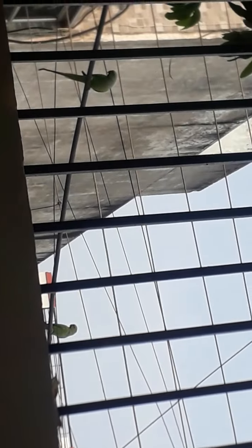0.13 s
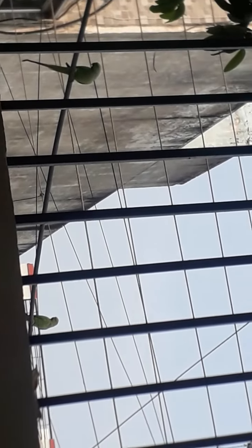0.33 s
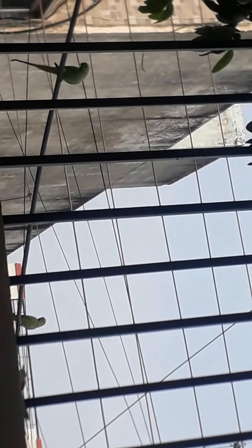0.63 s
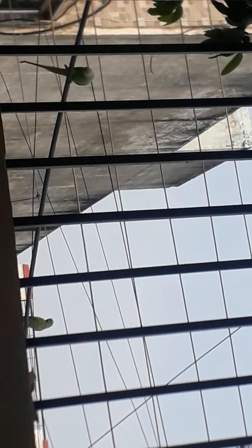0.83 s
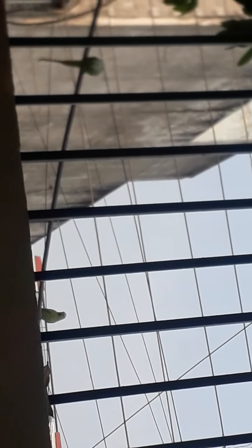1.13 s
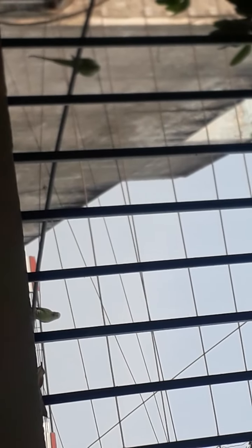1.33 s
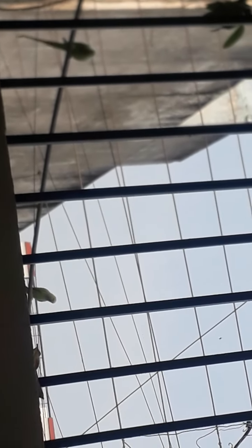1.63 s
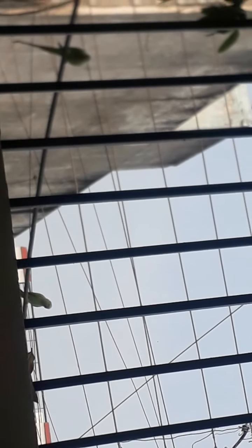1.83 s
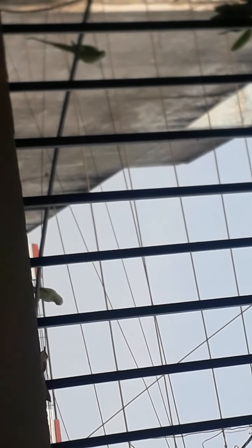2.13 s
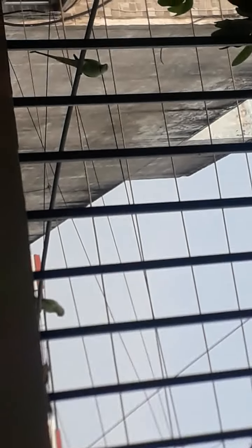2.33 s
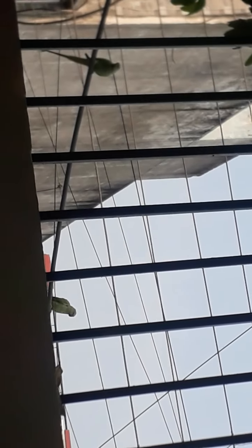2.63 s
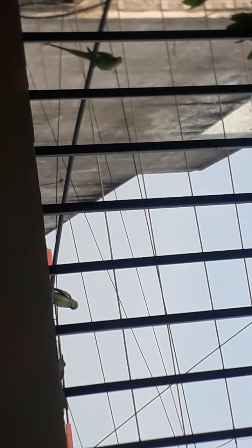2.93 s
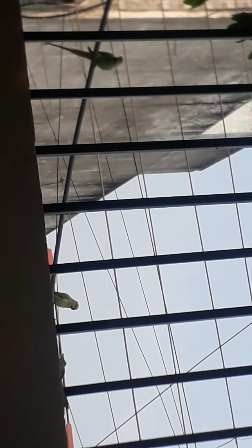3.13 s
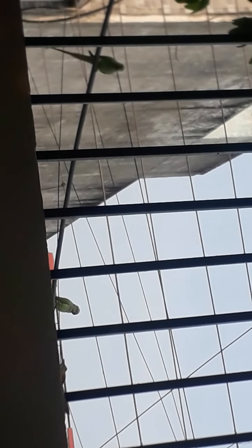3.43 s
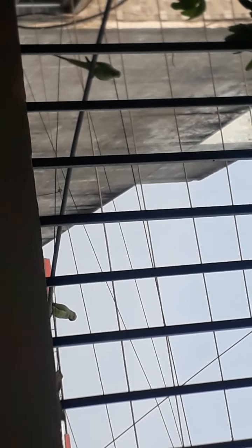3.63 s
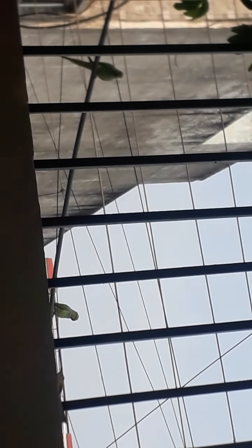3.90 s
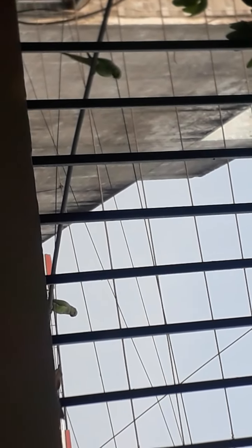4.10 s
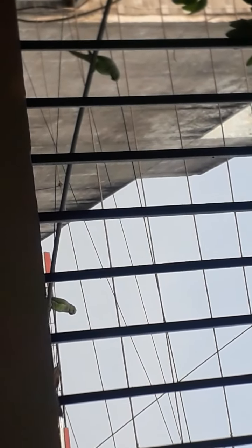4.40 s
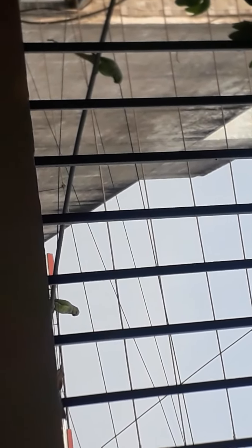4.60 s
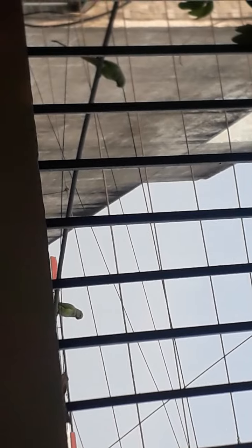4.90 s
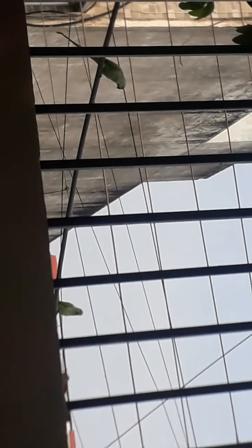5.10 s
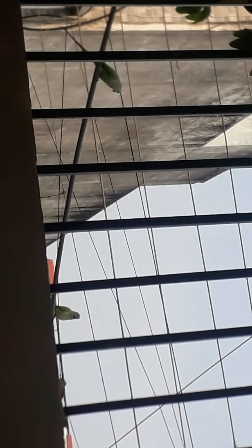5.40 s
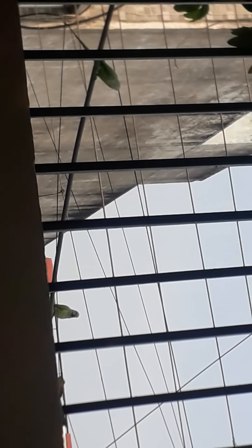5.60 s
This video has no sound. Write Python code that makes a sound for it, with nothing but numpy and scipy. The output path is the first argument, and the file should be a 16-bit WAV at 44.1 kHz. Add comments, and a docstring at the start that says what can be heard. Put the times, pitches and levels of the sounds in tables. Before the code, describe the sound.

Parakeets overhead in a narrow, hard-walled courtyard: three piercing calls, a gap, then a longer run starting with a rough, wobbling screech and ending in stragglers. Each squawk scoops up quickly and slides down, with a bright nasal edge. Behind them lie low rumble, distant traffic and a thin far machine whine. A phone picks it all up with an audible reverberant tail.

```python
"""Parakeets squawk from wires above a narrow courtyard: a run of three calls, then a longer run and stragglers.
Each call sums harmonics of a pitch that arches up and slides down through the throat's resonances.
Each run opens with a harsh screech: a rising yelp, a brief whistle, then a warbling rasp.
The walls return echoes and a diffuse tail. Shaped noise makes the town rumble and traffic;
wavering sines make a far machine whine and passing tones; a brief rush of noise opens the scene."""
import sys
import numpy as np
from scipy import signal
from scipy.fft import rfft, irfft
from scipy.io import wavfile
from scipy.ndimage import uniform_filter1d, map_coordinates

SR = 44100
rng = np.random.default_rng(int(sys.argv[2]) if len(sys.argv) > 2 else 0)


def store_pcm(level_fs):
    """Save levels as 16-bit WAV."""
    pcm = np.round(np.clip(level_fs, -1, 1) * 32767).astype(np.int16)
    wavfile.write(sys.argv[1], SR, np.atleast_2d(pcm).T)


N = 253575
TIME_S = np.arange(N) / SR

# opening rush spectrum, relative: f/Hz, density/dB
RUSH_SPECTRUM = [(200, -21), (450, -7.5), (700, -0.5), (1050, 1.5), (1400, 1), (1800, 2), (2700, -2.5),
                 (3100, -7.5), (4200, -12), (5000, -11), (5800, -5.5), (6900, -10.5), (8000, -33),
                 (15000, -52)]
RUSH_DB, RUSH_DECAY_DB_PER_S = -38.5, 43.5
RUSH_START_S, RUSH_ATTACK_S, RUSH_HOLD_S = -0.026, 0.097, 0.094

# town rumble spectrum, relative: f/Hz, density/dB
TOWN_SPECTRUM = [(20, -35), (40, -7), (60, -13.5), (80, 3), (102, 0), (122, -2.5), (170, -0.5), (300, -7),
                 (900, -9), (2400, -12.5), (3100, -23.5), (4300, -25), (6500, -25), (8000, -43),
                 (15500, -32)]
TOWN_DB = -54
# distant traffic spectrum, relative: f/Hz, density/dB
TRAFFIC_SPECTRUM = [(50, -9.5), (120, -5), (240, 5.5), (450, 1.5), (700, -1), (1100, -1.5), (2500, -31.5)]
TRAFFIC_DB = -62.5
# passing traffic swells: t/s, half length to 1/e/s, level added to the steady gain/dB
TRAFFIC_SWELLS = [(2.83, 0.42, -56.5), (4.4, 1, -64.5)]
# far machine whine before sway: f/Hz, rms level/dB
MACHINE_WHINE = [(953, -70.5), (1168, -64), (2336, -63), (3505, -82)]
# distant tones that come and go, before sway: start t/s, end t/s, f/Hz, rms level/dB
PASSING_TONES = [(.3, 1.038, 3670, -70), (2.1, 2.898, 3650, -66.5), (2.1, 2.9, 3390, -72.5),
                 (2.1, 2.9, 3994, -79), (4.35, 4.793, 301.7, -59.5), (4.794, 5.615, 296.4, -60)]

# throat and beak resonances, run 0: f/Hz, gain/dB
FIRST_THROAT = [(300, -52), (1450, -17.5), (1850, -13.5), (2550, -10), (3100, -12), (4000, -10.5),
                (5000, -4), (5800, 4), (7200, -8.5), (8200, -22), (10000, -31), (11500, -21.5),
                (13200, -31.5), (15500, -54)]
# throat and beak resonances, run 1: f/Hz, gain/dB
SECOND_THROAT = [(300, -17), (1520, -22.5), (1850, -18), (2450, -15.5), (3100, -21), (4100, -12.5),
                 (4900, -5.5), (5400, -10), (6200, 0), (7400, -23), (10000, -30.5), (11000, -39),
                 (12000, -35), (15500, -49)]
# call levels below are before the throat gain
# yelps: run (0 or 1), t/s, time to crest/s, crest f/Hz, level at end/dB, start level re end/dB
YELPS = [(0, 1.158, .045, 2633, -21, -14), (1, 2.791, .048, 2680, -14, -26)]
# voice broken into a whistle inside a screech:
# t/s, length/s, f/Hz, fundamental's peak level/dB, second partial re fundamental/dB
WHISTLES = [(1.201, 0.0043, 3700, -30.5, 3), (1.208, .008, 3620, -37.5, 10),
            (2.832, .054, 4050, -26.5, -23)]
# rasps: run (0 or 1), t/s, length/s, base f/Hz, level/dB, loudest at (share of length),
# start roughness (0-1), roughness gained by end (0-1), warble rate at start f/Hz, at end f/Hz,
# warble depth (share of pitch), warble decay/s, throb (sign sets its sense)/dB
RASPS = [ (0, 1.2159, .088, 2569, -18.5, 0.59, 0.08, 0.12, 97, 95, .17, .033, -3.5),
         (1, 2.88, .14, 2310, -20, 0.19, 0.07, 0.67, 54.93, 21.9, 0.202, 0.184, 4)]
# clear squawks: run (0 or 1), t/s, time to crest/s, drop from crest/s, length/s,
# crest f/Hz, shoulder f/Hz, level/dB, crest accent/dB, fade over slide/dB, base roughness (0-1)
SQUAWKS = [ (0, 1.448, .0435, .0125, 0.16, 2596, 1946, -19, -1, -7, 0.04),
           (0, 1.771, .043, .0125, 0.14, 2463, 1859, -21, 0, -6, 0.09),
           (1, 3.131, .0355, .013, 0.16, 2586, 2133, -18.5, 0.5, -5.5, 0.07),
           (1, 3.417, .038, 0.017, .150, 2665, 2081, -18, 1, -5.5, .1),
           (1, 3.687, .0405, .015, 0.15, 2585, 2032, -18.5, 1, -5.5, 0.07),
           (1, 3.950, .0464, .0204, .161, 2583, 2048, -18.5, 1, -5.5, 0.09),
           (1, 4.224, .0405, .0186, .160, 2586, 2007, -18.5, 2, -7, .1),
           (1, 4.721, .0455, .0162, .146, 2625, 2035, -18.5, 0, -6, 0.08),
           (1, 4.977, .0457, .018, 0.16, 2577, 1988, -20, 3, -6, .1),
           (1, 5.566, .0458, .018, 0.15, 2470, 2052, -18, 0.5, -6.5, 0.09)]

# scoop: slack, croaking membrane pulled taut and clear
SLACK_HZ, TAUT_HZ, SCOOP_S = 950, 1750, .03
# soft croak, then full voice shortly before the crest
CROAK_DB, SWELL_LEAD_S, SWELL_S = -16.5, .0245, .0019
ATTACK_S, RELEASE_S = .004, .024
# past the shoulder: steady sag, then a plunge as the air runs out
SHOULDER_S, SAG_HZ_PER_S, PLUNGE_SHARE, PLUNGE_S = .03, 4500, .5, .0105
YELP_BREAK_S, YELP_RELEASE_S = 0.0093, 0.0046
# droop: level lost, times squared distance (share of length) from the loudest moment
RASP_FALL_SHARE, RASP_DROOP_DB, RASP_RELEASE_S = .43, -21, .005
# roughness 0-1: added by slackness on the way up and down; of a taut yelp
SCOOP_ROUGH, PLUNGE_ROUGH, YELP_ROUGH = 0.55, 0.068, 0.044
# treble gain per dB of effort; loss of upper harmonics on a crest
EDGE_DB_PER_DB, PURE_DB = .4, -9.5

# single wall echoes before colour and mix: delay t/s, level/dB
WALL_ECHOES = [(.0034, -13.5), (.0085, -10.5), (.019, -11), (.033, -13.5), (0.069, -18.5), (0.119, -22.5)]
# wall echo colour: f/Hz, gain/dB
ECHO_COLOUR = [(1500, 0.5), (2500, -6.5), (3500, 9), (4500, 3.5), (6500, 1), (9000, -17), (14000, -30)]
# courtyard ring time: f/Hz, T60/s
COURT_T60 = [(500, 0.91), (2000, 0.82), (4000, 0.64), (6500, 0.66), (12000, 0.16)]
# colour of the scatter and tail: f/Hz, gain/dB
COURT_COLOUR = [(1000, 13.5), (2400, 2), (3000, 15.5), (3700, 10), (4500, -2.5), (5400, -6.5), (6000, -7),
                (6900, -1), (9000, 1.5), (14000, 0)]

TOP_HZ = 15800


def undb(db):
    """Decibels to amplitude gain."""
    return 10 ** (np.asarray(db) / 20)


def at_hz(points, hz):
    """Read (f, value) points on a log-frequency axis."""
    f, value = np.transpose(points)
    return np.interp(np.log(np.maximum(hz, 1)), np.log(f), value)


def noise(spectrum):
    """Gaussian noise filtered to a spectrum, rms 1."""
    gain = undb(at_hz(spectrum, np.fft.rfftfreq(N, 1 / SR)))
    x = irfft(rfft(rng.standard_normal(N)) * gain, N)
    return x / x.std()


def wander(rate_hz, size):
    """Smooth random curve through normal draws of spread 1, rate_hz draws a second."""
    steps = np.arange(size) / SR * rate_hz
    return map_coordinates(rng.standard_normal(8192), [steps], order=3, mode="wrap")


def add(out, start_s, x):
    """Mix x into out from start_s."""
    i = int(start_s * SR)
    out[i:i + len(x)] += x[:max(N - i, 0)]


def rush(flicker_db=0.36):
    """Broadband noise that swells, holds and decays exponentially."""
    t = TIME_S - RUSH_START_S
    attack = np.clip(t / RUSH_ATTACK_S, 0, 1)
    decay_db = RUSH_DECAY_DB_PER_S * np.maximum(t - RUSH_ATTACK_S - RUSH_HOLD_S, 0)
    level_db = RUSH_DB - decay_db + flicker_db * wander(60, N)
    return noise(RUSH_SPECTRUM) * attack * undb(level_db)


def far_tone(hz, db, drift_share, sway_db=2.5):
    """Distant sine whose pitch and level waver."""
    phase = 2 * np.pi * np.cumsum(hz * (1 + drift_share * wander(90, N))) / SR
    return np.sqrt(2) * np.sin(phase) * undb(db + sway_db * wander(14, N))


def town(sway_db=0.76, fade_s=.12):
    """Swaying rumble noise, swelling traffic noise, a far machine's whine and passing tones."""
    out = noise(TOWN_SPECTRUM) * undb(TOWN_DB + sway_db * wander(3.34, N))
    swells = sum(undb(db) * np.exp(-((TIME_S - s) / half_s) ** 2) for s, half_s, db in TRAFFIC_SWELLS)
    out += noise(TRAFFIC_SPECTRUM) * (undb(TRAFFIC_DB) + swells)
    for hz, db in MACHINE_WHINE:
        out += far_tone(hz, db, drift_share=.002)
    for start_s, end_s, hz, db in PASSING_TONES:
        fade = np.clip(np.minimum(TIME_S - start_s, end_s - TIME_S) / fade_s, 0, 1)
        out += far_tone(hz, db, drift_share=0.00337) * fade
    return out


def syrinx(hz, db, rough, throat, jitter=0.1, shimmer=0.89, jitter_rate_hz=1300, hiss_db=-10,
           waver=0.0074, flutter_db=1.79, pure_db=PURE_DB, edge_db_per_db=EDGE_DB_PER_DB, edge_hz=8000):
    """Harmonics of a jittering membrane, weighted by the throat resonances, with hissing air."""
    size = len(hz)
    hz = uniform_filter1d(hz, size=160) * (1 + waver * wander(213.0, size))
    jittered_hz = hz * (1 + jitter * rough * wander(jitter_rate_hz, size))
    phase = 2 * np.pi * np.cumsum(jittered_hz) / SR
    # a membrane stretched for the crest sheds its upper harmonics
    upper_db = pure_db * np.clip((hz - 2200) / 350, 0, 1)
    # the cutting top grows with effort
    top_db = edge_db_per_db * (db - db.max() - 2.5)
    tone = np.zeros(size)
    for k in np.arange(1, 13):
        gain_db = at_hz(throat, k * hz) + upper_db * (k > 2) + top_db * (k * hz > edge_hz)
        tone += undb(gain_db) * np.sin(k * phase) * (k * hz < SR / 2)
    throat_gain = undb(at_hz(throat, np.fft.rfftfreq(size, 1 / SR)))
    air = irfft(rfft(rng.standard_normal(size)) * throat_gain, size)
    pressure = undb(db + flutter_db * wander(157.0, size))
    shimmering = tone * (1 + shimmer * rough * wander(700, size))
    hiss = undb(hiss_db) * rough * air / air.std()
    return pressure * (shimmering + hiss)


def scoop_hz(t, crest_s, crest_hz):
    """Pitch rises from the slack membrane to a rounded crest."""
    return SLACK_HZ + (crest_hz - SLACK_HZ) * np.exp(-(np.abs(crest_s - t) / SCOOP_S) ** 3)


def swell_db(t, crest_s):
    """Soft croak swells to full voice on the way up."""
    return CROAK_DB * (1 - np.tanh((t - crest_s + SWELL_LEAD_S) / (2 * SWELL_S))) / 2


def gate_db(t, release_s):
    """Attack and release of one note."""
    gain = np.minimum(t / ATTACK_S, (t[-1] - t) / release_s)
    return 20 * np.log10(np.clip(gain, 1e-3, 1))


def croak(hz):
    """Membrane slackness, 0 (taut, clear) to 1 (slack, rough)."""
    return np.clip((TAUT_HZ - hz) / (TAUT_HZ - SLACK_HZ), 0, 1)


def yelp(throat, crest_s, crest_hz, db, start_db):
    """A tightening membrane scoops up, grows louder and breaks off before its crest."""
    t = np.arange(0, crest_s - YELP_BREAK_S, 1 / SR)
    hz = scoop_hz(t, crest_s, crest_hz)
    level_db = db + start_db * (1 - t / t[-1]) + gate_db(t, YELP_RELEASE_S)
    return syrinx(hz, level_db, YELP_ROUGH + SCOOP_ROUGH * croak(hz), throat)


def whistles(waver=0.015, third_db=-26, edge_s=0.0013):
    """The membrane jumps to a high register of three partials."""
    out = np.zeros(N)
    for start_s, length_s, hz, db, second_db in WHISTLES:
        t = np.arange(0, length_s, 1 / SR)
        phase = 2 * np.pi * np.cumsum(hz * (1 + waver * wander(250, len(t)))) / SR
        tone = np.sin(phase) + undb(second_db) * np.sin(2 * phase) + undb(third_db) * np.sin(3 * phase)
        fade = np.clip(np.minimum(t, length_s - t) / edge_s, 0, 1)
        add(out, start_s, undb(db) * tone * fade)
    return out


def rasp(throat, length_s, hz, db, loudest, rough, rough_gain, first_rate_hz, last_rate_hz, depth,
         decay_s, throb_db, quiver=.15, quiver_rate_hz=380):
    """A forced call falls ever faster as pitch warbles and quivers and level throbs with the warble."""
    t = np.arange(0, length_s, 1 / SR)
    done = t / length_s
    rate_hz = first_rate_hz + (last_rate_hz - first_rate_hz) * done
    turn = 2 * np.pi * np.cumsum(rate_hz) / SR
    warble = np.exp(-t / decay_s)
    swing = depth * warble * (quiver * wander(quiver_rate_hz, len(t)) - np.cos(turn))
    pitch_hz = hz * (1 - RASP_FALL_SHARE * done ** 2) * (1 + swing)
    throb = throb_db * warble * np.sin(turn - np.pi / 4)
    level_db = db + RASP_DROOP_DB * (done - loudest) ** 2 + throb + gate_db(t, RASP_RELEASE_S)
    return syrinx(pitch_hz, level_db, rough + rough_gain * done ** 2, throat,
                  edge_db_per_db=0.2, pure_db=-6.5, hiss_db=-10.5)


def squawk(throat, crest_s, drop_s, length_s, crest_hz, shoulder_hz, db, accent_db, fade_db, rough):
    """A clear call scoops up, drops from crest to shoulder, sags as it fades and plunges at the end."""
    t = np.arange(0, length_s, 1 / SR)
    past_s = np.maximum(t - crest_s, 0)
    arch = np.exp(-(past_s / drop_s) ** 2)
    slide_hz = shoulder_hz - SAG_HZ_PER_S * (past_s - SHOULDER_S)
    fall_hz = slide_hz + (crest_hz - slide_hz) * arch
    hz = np.where(t < crest_s, scoop_hz(t, crest_s, crest_hz), fall_hz)
    hz = hz * (1 - PLUNGE_SHARE * np.exp((t - length_s) / PLUNGE_S))
    level_db = db + swell_db(t, crest_s) + accent_db * arch
    level_db += fade_db * past_s / past_s[-1] + gate_db(t, RELEASE_S)
    slack_rough = np.where(t < crest_s, SCOOP_ROUGH, PLUNGE_ROUGH) * croak(hz)
    return syrinx(hz, level_db, rough + slack_rough, throat)


def calls(throat, order):
    """All yelps, rasps and squawks of run 0 or 1."""
    out = np.zeros(N)
    for voice, table in (yelp, YELPS), (rasp, RASPS), (squawk, SQUAWKS):
        for run, start_s, *shape in table:
            if round(run) == order:
                add(out, start_s, voice(throat, *shape))
    return out


def courtyard(x, late_db, early_db, echo_db, early_s=0.019, build_s=0.037):
    """Direct sound, single wall echoes, dense early scatter and a tail whose high treble dies soonest."""
    t = TIME_S[:SR]
    hz = np.fft.rfftfreq(SR, 1 / SR)
    grain = rfft(rng.standard_normal(SR)) * undb(at_hz(COURT_COLOUR, hz))
    walls = np.zeros(SR)
    for delay_s, db in WALL_ECHOES:
        walls[int(delay_s * SR)] += undb(db + echo_db)
    response = irfft(rfft(walls) * undb(at_hz(ECHO_COLOUR, hz)), SR)
    early = np.exp(-t / early_s)
    early_shape = undb(early_db) * early / np.linalg.norm(early)
    edges_hz = np.r_[0, np.geomspace(1000, SR / 2, 12)]
    for lo, hi in zip(edges_hz, edges_hz[1:]):
        t60_s = at_hz(COURT_T60, (lo + hi) / 2)
        late = np.exp(-np.log(1000) * t / t60_s) * (1 - np.exp(-t / build_s))
        late_shape = undb(late_db) * late / np.linalg.norm(late)
        band = irfft(grain * (hz >= lo) * (hz < hi), SR)
        response += np.hypot(late_shape, early_shape) * band
    return x + signal.fftconvolve(x, response)[:N]


def scene():
    """Calls in the courtyard over town and rush; run 1 and all whistles come more off the walls."""
    birds = courtyard(calls(FIRST_THROAT, order=0), late_db=-9.5, early_db=-9.5, echo_db=-3.5)
    second_run = calls(SECOND_THROAT, order=1) + whistles()
    birds += courtyard(second_run, late_db=-4.5, early_db=-7.5, echo_db=-1.5)
    return (birds + town() + rush())[None]


def record(dry):
    """The phone cuts the top: a steep elliptic low-pass."""
    low_pass = signal.ellip(10, .2, 80, TOP_HZ, fs=SR, output="sos")  # ripple/dB, stopband/dB
    return signal.sosfilt(low_pass, dry)


dry = scene()
out = record(dry)
store_pcm(out)
```